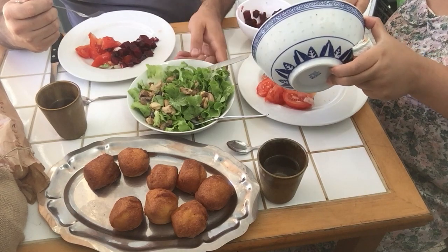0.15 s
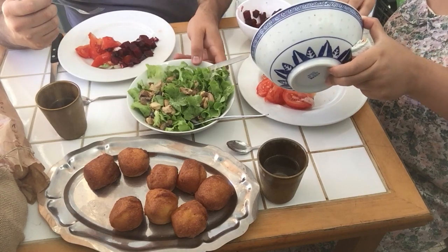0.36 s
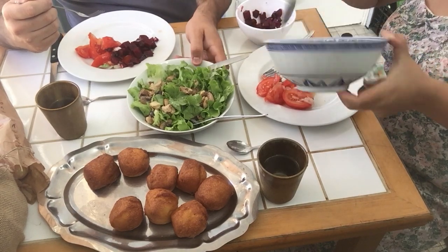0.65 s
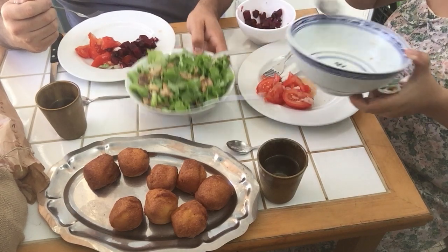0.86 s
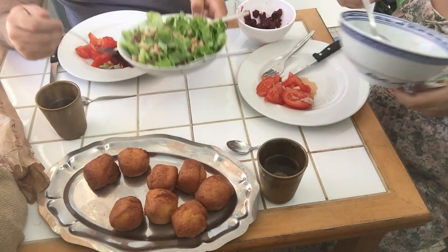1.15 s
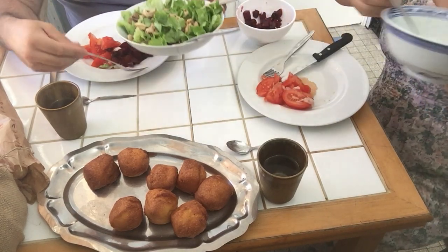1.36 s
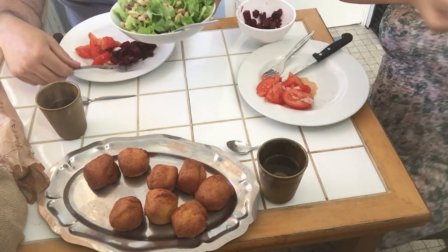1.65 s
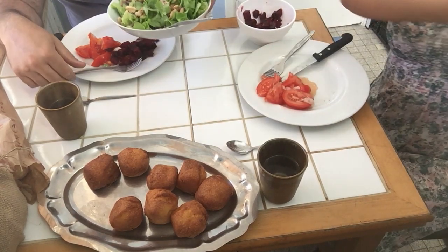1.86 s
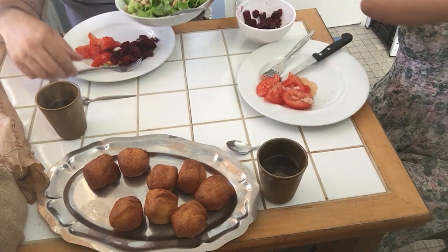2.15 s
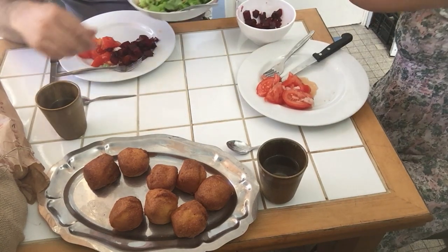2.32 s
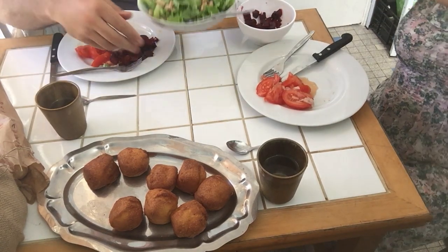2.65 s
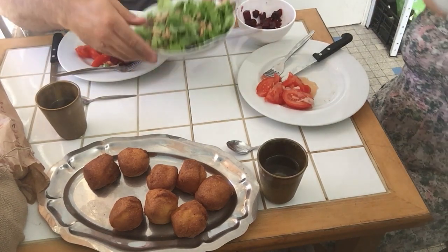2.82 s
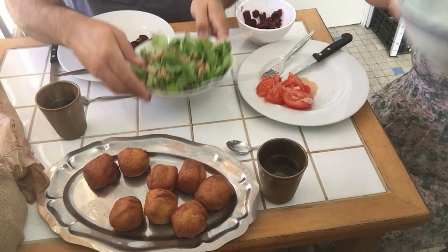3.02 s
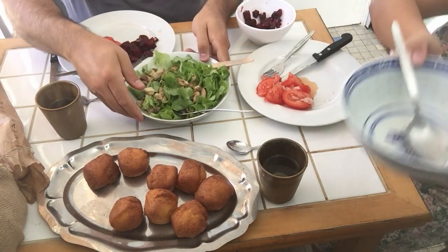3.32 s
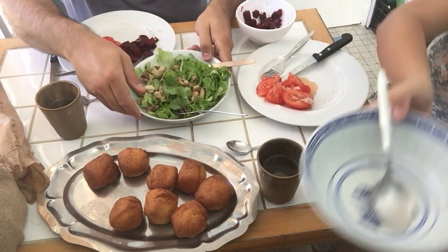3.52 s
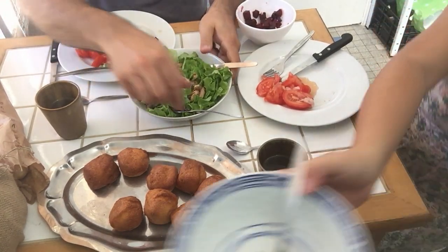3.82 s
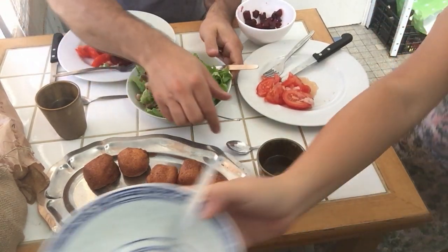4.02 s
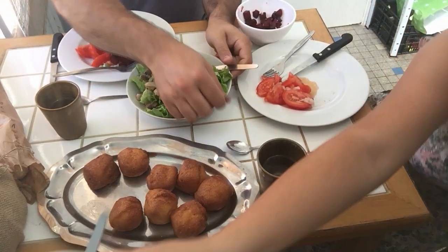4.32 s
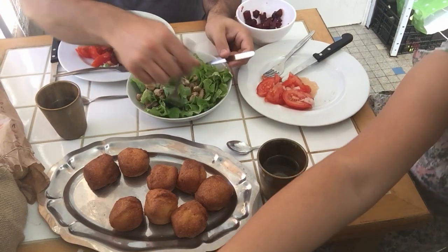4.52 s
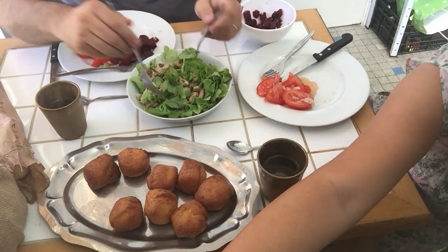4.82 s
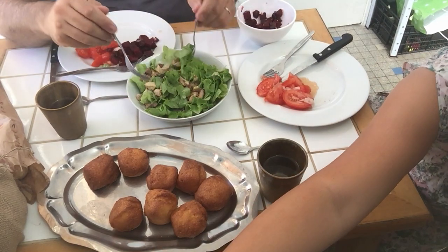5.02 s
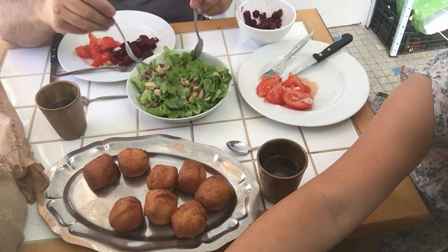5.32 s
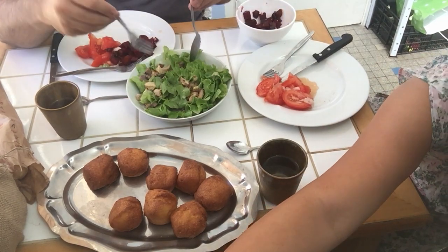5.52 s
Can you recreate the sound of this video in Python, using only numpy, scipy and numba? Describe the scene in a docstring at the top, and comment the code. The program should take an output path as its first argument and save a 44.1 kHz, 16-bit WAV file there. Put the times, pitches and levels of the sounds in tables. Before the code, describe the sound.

Close to the microphone in a small, hard, lively kitchen, a steel spoon clinks brightly in a porcelain bowl. Cutlery then chatters on a plate with dull table thuds. A shoe sole scuffs the floor, a bowl is set down in a hard cluster of knocks, servers clink on glass and scrape briefly, and faint wooden taps finish. Low hum and air beneath; sound only in the left channel.

```python
"""Laying up in a small hard kitchen

Close to the microphone, a steel spoon clinks in a porcelain bowl, cutlery rattles on a plate, servers knock
a glass bowl, dishes land on a tiled table and wooden servers tap: each blow rings a bank of decaying modes.
Filtered noise makes the gritty scrapes, the deep thumps under some blows and a sole scuffing the floor.
A dense noise tail is the room; wavering mains hum, air and a faint rustle lie beneath.
Only the left input of the recorder is wired."""
import sys
import numpy as np
from numba import njit
from scipy import signal
from scipy.fft import rfft, irfft, next_fast_len
from scipy.io import wavfile
from scipy.ndimage import uniform_filter1d

SR = 44100
rng = np.random.default_rng(int(sys.argv[2]) if len(sys.argv) > 2 else 0)


def wav_out(sig):
    """Save sig, one row per channel (or a flat mono array), as 16-bit PCM at SR to the path in sys.argv[1]."""
    wavfile.write(sys.argv[1], SR, np.round(np.clip(np.atleast_2d(sig).T, -1, 1) * 32767).astype(np.int16))


N = 249867  # length in samples
# All scene levels are those ahead of the recorder's input gain.


def undb(db):
    """Decibels to gain."""
    return 10 ** (np.asarray(db) / 20)


def unit(x):
    """Scale to rms 1."""
    return x / np.sqrt(np.mean(x ** 2))


def colour(x, points):
    """Shape a spectrum by (f/Hz, level/dB) points joined on a log frequency axis."""
    hz, db = np.transpose(points)
    size = next_fast_len(len(x))
    f = np.maximum(np.arange(size // 2 + 1) * SR / size, 1)
    gain = undb(np.interp(np.log(f), np.log(hz), db))
    return irfft(rfft(x, size) * gain, size)[:len(x)]


def level_curve(table):
    """Join (t/s, level/dB) points by straight lines, at every sample."""
    s, db = np.transpose(table)
    return np.interp(np.arange(N) / SR, s, db)


def walk(rate):
    """Random levels, rate of them a second, slewed from one to the next; spread near 1."""
    k = int(SR / rate)
    steps = np.repeat(rng.standard_normal(N // k + 1), k)
    return 1.2 * uniform_filter1d(steps, k)[:N]


SWELL_DB = 25  # a movement rises by this much as it swells


def stroke(start_s, swell_s, hold_s, fade_db_per_s, db):
    """Gain of one movement: swell, hold, fade."""
    t = np.arange(N) / SR - start_s
    swell_db = SWELL_DB * np.clip(1 - t / swell_s, 0, 1)
    fade_db = fade_db_per_s * np.maximum(t - swell_s - hold_s, 0)
    return (t > 0) * undb(db - swell_db - fade_db)


@njit(fastmath=True)
def resonate(push, pole, gain):
    """A bank of decaying modes driven by a force."""
    out, re, im = np.zeros(len(push)), np.zeros(len(pole)), np.zeros(len(pole))
    c, s = pole.real.copy(), pole.imag.copy()
    for i in range(len(push)):
        total = 0.
        for k in range(len(c)):
            re[k], im[k] = re[k] * c[k] - im[k] * s[k] + push[i], re[k] * s[k] + im[k] * c[k]
            total += gain[k] * im[k]
        out[i] = total
    return out


def contact(blow, chatter, short, length):
    """The contact force chatters: one firm touch, then a fading shower of lesser ones."""
    fade = np.exp(-short / max(blow["rattle_s"], 1 / SR))
    lesser = rng.standard_normal(len(short)) * (rng.random(len(short)) < .03)
    touch = np.full(length, 1e-18)  # a trace of force keeps the arithmetic fast
    touch[:len(short)] = chatter * lesser * fade
    touch[0] = 1
    push = np.hanning(int(blow["push_s"] * SR) + 3)  # a softer contact pushes longer
    return np.convolve(touch / np.linalg.norm(touch), push / push.sum())[:length]


# The points of every blow's colour: f/Hz
COLOUR_HZ = [400, 1300, 4000, 11000]
PIVOT_HZ = 2300  # brightness tilts the colour about this pitch
CRACK_DULL_DB = -8  # the crack has less treble than the ring


def crack(blow, tone_db, short):
    """The noise of the contact itself, a quick burst that fades with the rattle."""
    floor = (COLOUR_HZ[0] / 2, tone_db[0] - 22)
    tone = [floor] + list(zip(COLOUR_HZ, tone_db + np.array([0, 0, 0, CRACK_DULL_DB])))
    noise = colour(rng.standard_normal(len(short)), tone)
    fade = np.exp(-short / max(blow["rattle_s"], 1 / SR))
    return noise * fade * (1 - np.exp(-short / .0007)) * undb(blow["crack_db"])


SPOT_DB, SPOT_OCTAVES = 6, .12  # lift of modes near the struck spot's pitch, and its reach


def strike(blows, columns, kind, hz, body, span_s, shift, chatter, tool=()):
    """Each blow rings the modes of a body (and of the tool); what its row omits comes from its kind."""
    out = np.zeros(N)
    db, t60 = np.transpose(list(body) + list(tool))
    is_tool = np.arange(len(db)) >= len(body)
    t = np.arange(int(span_s * SR)) / SR
    short = t[:SR // 8]
    for s, level_db, *rest in blows:
        blow = {"tool_db": 0, "spot_hz": 1, **kind, **dict(zip(columns.split(), rest))}
        tone_db = blow["tone_db"] + blow["bright_db"] * np.log2(np.array(COLOUR_HZ) / PIVOT_HZ)
        spot_octaves = np.log2(np.array(hz) / blow["spot_hz"])
        spot_db = SPOT_DB * np.exp(-(spot_octaves / SPOT_OCTAVES) ** 2)
        mode_tone_db = np.interp(np.log(hz), np.log(COLOUR_HZ), tone_db)
        gain = undb(db + is_tool * blow["tool_db"] + spot_db + mode_tone_db)
        pitch = hz * (1 + shift * rng.standard_normal(len(db)))  # grip and struck spot shift the modes
        # the hand adds its loss to that of the ware, most to the low modes
        loss = np.log(1000) * (1 / t60 + 1000 / pitch / max(blow["grip_s"], .01))
        force = contact(blow, chatter, short, len(t))
        pole = np.exp((2j * np.pi * pitch - loss) / SR)
        sound = resonate(force, pole, gain / np.linalg.norm(undb(db)))
        sound[:len(short)] += crack(blow, tone_db, short)
        end_fade = np.clip((span_s - t) * 20, 0, 1)
        i = int(s * SR)
        out[i:i + len(t)] += (undb(level_db) * sound * end_fade)[:N - i]
    # each kind sends out nothing below its lowest pitch
    return signal.sosfilt(signal.butter(4, kind["low_hz"], "high", fs=SR, output="sos"), out)


# The hum's fundamental, wavering and growing: t/s, level/dB
HUM = [(0.0, -71), (0.19, -66), (0.33, -81), (0.41, -68), (1.04, -72), (1.83, -64), (2.24, -70),
       (2.49, -64), (3.68, -65), (3.85, -59), (3.93, -70), (4.07, -59), (4.2, -68), (4.31, -60),
       (4.72, -63), (4.77, -71), (4.87, -62), (5.67, -64)]
MAINS_HZ, HUM_WAVER_DB = 49.4, 2.2
HUM_SECOND_DB, HUM_THIRD_DB = -77, -74  # harmonics


def mains_hum():
    """A sine and two harmonics share one wandering pitch; each wavers in level by itself."""
    turn = 2 * np.pi * np.cumsum(MAINS_HZ * (1 + 0.0067 * walk(2.2))) / SR
    first = undb(level_curve(HUM) + HUM_WAVER_DB * walk(7)) * np.sin(turn)
    second = undb(HUM_SECOND_DB + 2.5 * walk(6)) * np.sin(2 * turn + 1)
    third = undb(HUM_THIRD_DB + 2.6 * walk(7)) * np.sin(3 * turn + 2)
    return np.sqrt(2) * (first + second + third)  # levels are rms


# Colour of the still air, relative: f/Hz, level/dB
AIR = [(35, -27.5), (60, -3.5), (108, -10.5), (412, -12), (675, -16), (1010, -17.5), (2040, -29),
       (2350, -19.5), (2580, -36.5), (3260, -27), (6150, -29.5), (14700, -39.5), (16500, -57.5)]
AIR_DB = -72.5  # rms


def still_air():
    """Steady noise, strongest in the bass."""
    points = [(30, -40.5)] + list(AIR)
    return undb(AIR_DB) * unit(colour(rng.standard_normal(N), points))


# Sleeves and leaves rub: t/s, level/dB
RUBBING = [(0, -77.5), (2.1, -68.5), (2.35, -74), (2.9, -68.5), (3.3, -71), (3.95, -75.5), (4.55, -69.5),
           (4.9, -74), (5.45, -75.5), (5.67, -69)]


def rustle():
    """Faint hiss of sleeves and leaves, flickering in level."""
    tone = [(300, -18.5), (1000, 0), (3500, 0), (7000, -7), (12000, -17.5)]
    hiss = unit(colour(rng.standard_normal(N), tone))
    flicker_db = 1.2 * walk(20)
    return undb(level_curve(RUBBING) + flicker_db) * hiss


# In the blow tables and kinds below, brightness is in dB/octave about PIVOT_HZ; rattle is the time in which
# the contact noise fades to 1/e; grip ring is the t60 that the hand's loss alone would allow at 1 kHz.
# A kind holds what its blows share: tone/dB at COLOUR_HZ, crack/dB, rattle/s, grip ring/s, brightness,
# lowest pitch sent out/Hz, extra length of the push/s.

# Spoon blows: t/s, level/dB, brightness/(dB/octave), grip ring/s, pitch favoured by the struck spot f/Hz
SPOON_IN_BOWL = [(.06, -30, -2.5, .17, 2920), (.393, -17.5, .3, .12, 4600), (.459, -24, -1.5, .27, 2920),
                 (.973, -12, -.3, 2.7, 11950), (1.667, -19, 3, .16, 3050)]
# The porcelain bowl's modes: f/Hz
BOWL_HZ = [878, 930, 1692, 2920, 2928, 3600, 4462, 4505, 5200, 5680, 6310, 6616, 8430, 9790, 10170, 10790,
           11360, 11950, 12680, 13345, 13900, 14520, 15175, 15430]
# The same modes: level/dB, free t60/s
BOWL = [(-12.5, 4), (-11.5, 0.2), (-11, 1.6), (-13.5, .7), (-3, 0.15), (-18.5, 0.16), (-3, 0.28),
        (-2.5, 0.051), (-27, 0.3), (-13, 0.1), (-1, 0.2), (-29, .4), (-5.5, .17), (-49, .35), (-34, .4),
        (-20, 0.26), (-22.5, 0.35), (-10, 0.29), (-12, .15), (-26, 0.22), (-19, 0.22), (-21, .3),
        (-22, 0.33), (-26, 0.14)]
# Kind: steel on porcelain
SPOON = dict(tone_db=[-22, -11, -2, -8], crack_db=3, rattle_s=.0065, low_hz=650, push_s=0)


def spoon_in_bowl():
    """Hard steel on porcelain: almost no pitch shift, little chatter, a long ring."""
    return strike(SPOON_IN_BOWL, "bright_db grip_s spot_hz", SPOON, BOWL_HZ, BOWL, .62,
                  shift=.0003, chatter=.08)


# Soft, dull thuds: t/s, level/dB, rattle/s
THUDS = [(.756, -50, .019), (1.029, -32, .024), (1.377, -37, .013), (1.572, -34, .011), (1.76, -39, .02),
         (4.2, -44, .025), (4.46, -46, .015), (5.508, -45, .004), (5.59, -50, .03)]
# The table top's modes: f/Hz
TABLE_HZ = [300, 375, 430, 560, 660, 780, 900, 1025, 1250, 1480, 1680, 2000, 2460, 3040, 4600, 5680, 7430]
# The same modes: level/dB, free t60/s
TABLE = [(-5, .2), (0.5, 0.85), (2, 0.12), (-4.5, 0.23), (-1, 0.11), (-3, 0.3), (-6, 0.11), (-1.5, .12),
         (-4, 0.065), (-12.5, 0.037), (-5.5, 0.056), (-15.5, 0.065), (-4, 0.049), (-6.5, 0.064),
         (-5.5, .09), (-13, .06), (-5, 0.041)]
# Kind: a soft contact on the table
PALM = dict(tone_db=[-1, -14, -20, -38], crack_db=-2, grip_s=.25, bright_db=0, low_hz=280, push_s=.0015)


def table_thuds():
    """A long soft push rings the table top with little treble."""
    return strike(THUDS, "rattle_s", PALM, TABLE_HZ, TABLE, .25, shift=.03, chatter=.4)


# Slides over china and tile: start t/s, swell/s, hold/s, fade/(dB/s), level/dB, brightness/(dB/octave)
SCRAPES = [(.787, .01, .005, 250, -57, 0), (1.58, .01, .04, 150, -54, 0), (4.195, .012, .035, 190, -43, .5),
           (5.53, .06, .1, 100, -65, -6)]
GRIT_PER_S, GRIT_DB = 5000, 2.5  # grains a second; mean of their random extra level


def scrapes():
    """Dense grains of uneven size, shaped by each slide."""
    base_tone = [(250, -14), (600, 3), (2500, 0), (7000, -2), (15000, -9)]
    out = 0
    for *move, bright_db in SCRAPES:
        hits = (rng.random(N) < GRIT_PER_S / SR) * rng.standard_normal(N)
        grains = hits * undb(GRIT_DB * rng.exponential(size=N))
        tone = [(hz, db + bright_db * np.log2(hz / PIVOT_HZ)) for hz, db in base_tone]
        out = out + stroke(*move) * unit(colour(grains, tone))
    return out


# Fork blows: t/s, level/dB, brightness/(dB/octave), rattle/s, ring of the fork level/dB,
# pitch favoured by the struck spot f/Hz, grip ring/s
FORK_ON_PLATE = [(.799, -40, 1, .004, -11, 2000, .1), (1.313, -32, 3.5, .016, -5, 7900, .2),
                 (1.379, -22, .5, .0076, -9.5, 1835, .35), (1.501, -38, 1, .024, 8, 3770, .2),
                 (1.534, -31, -1, .011, -11, 1835, .3), (1.572, -24, -1, .022, -6, 2170, .3),
                 (1.755, -20, .5, .02, 2, 2170, .25), (1.789, -28, -3, .013, 1, 2950, .3),
                 (1.809, -26, -1.5, .022, 1, 2170, .3), (1.892, -19, .5, .018, 3.5, 2700, .2),
                 (1.904, -22, -1, .02, 0, 1835, .4), (4.381, -33, 0, .006, 3, 1835, .07)]
# The plate's modes: f/Hz
PLATE_HZ = [985, 1835, 2169, 2790, 6670, 7880, 8015, 9213, 10120, 10680, 12200, 13390, 14800, 15300]
# The same modes: level/dB, free t60/s
PLATE = [(-25, 2.6), (-2.5, 0.32), (-4.5, 0.17), (3.5, 0.11), (-4, 0.18), (-2, 0.11), (-10.5, .3),
         (-22.5, 0.19), (-25, 0.1), (-25.5, 0.24), (-11, .2), (-19, .2), (-16, .25), (-28, 0.25)]
# The fork's modes: f/Hz
FORK_HZ = [2545, 2945, 3745, 3800, 4275, 4545, 4618, 5577, 9790, 11700, 13900]
# The same modes: level/dB, free t60/s
FORK = [(-5, 0.14), (-8, 0.24), (-10.5, 0.22), (-6.5, 0.31), (-13, 0.12), (-18.5, 0.35), (-10.5, 0.24),
        (-7.5, 0.36), (-14.5, .25), (-17.5, 0.42), (-34.5, 0.26)]
# Kind: cutlery on china
CUTLERY = dict(tone_db=[-18, -11, -9, -7], crack_db=1.5, low_hz=450, push_s=0)


def fork_on_plate():
    """A chattering contact rings plate and fork together."""
    return strike(FORK_ON_PLATE, "bright_db rattle_s tool_db spot_hz grip_s", CUTLERY,
                  PLATE_HZ + FORK_HZ, PLATE, .45, shift=.003, chatter=.4, tool=FORK)


# The table legs jolt: t/s, level/dB
THUMPS = [(1.38, -60), (3.445, -55), (3.69, -64)]
THUMP_HOLD_S, THUMP_FADE_DB_PER_S = .03, 250


def thumps():
    """A short deep rumble of low noise under a few of the table's blows."""
    tone = [(50, -30), (80, 0), (190, 0), (300, -30), (600, -70)]
    deep = unit(colour(rng.standard_normal(N), tone))
    return deep * sum(stroke(s, .01, THUMP_HOLD_S, THUMP_FADE_DB_PER_S, db) for s, db in THUMPS)


# The sole's resonances: f/Hz, a third of the bandwidth f/Hz, level/dB
SOLE = [(673, 22, 1), (872, 28.5, 1), (1130, 73, 2), (1423, 10, -1), (1630, 30, -13)]
# The drone's movement: start t/s, swell/s, hold/s, fade/(dB/s), level/dB
SCUFF_DRONE = (2.36, .08, .19, 90, -52.5)
# The hiss's movement: the same columns
SCUFF_HISS = (2.33, .3, .2, 85, -58)


def scuff():
    """Grit under a sliding sole drones in the sole's resonances; a slower hiss outlasts the drone."""
    grit = rng.standard_normal(N) * undb(1.36 * walk(60))
    drone = 0
    for hz, width, db in SOLE:
        peak = signal.iirpeak(hz, hz / max(3 * width, 20), SR)
        drone = drone + undb(db) * unit(signal.lfilter(*peak, grit))
    drone = colour(drone, [(420, -33), (560, 4.5), (1800, -5), (3000, -10)])
    hiss_tone = [(1000, -5), (2200, -0.5), (3600, 3.5), (5000, -6), (7000, -9), (11000, -38)]
    hiss = colour(rng.standard_normal(N), hiss_tone)
    return stroke(*SCUFF_DRONE) * unit(drone) + stroke(*SCUFF_HISS) * unit(hiss)


# Hard feet of dishes meet the table: t/s, level/dB, brightness/(dB/octave)
KNOCKS = [(3.441, -13, -1.5), (3.454, -16, 1.5), (3.472, -15, 0), (3.495, -20, 2), (3.516, -30, -1),
          (3.575, -20, 0), (3.685, -27, 0), (4.313, -30, -2.5), (4.443, -40, -3), (5.059, -32, -3)]
# Kind: a dish on the table
DISH = dict(tone_db=[-13, 0, -14, -31], crack_db=-3, rattle_s=.012, grip_s=.1, low_hz=330, push_s=.0001)


def dish_knocks():
    """Hard feet push briefly and ring the table top."""
    return strike(KNOCKS, "bright_db", DISH, TABLE_HZ, TABLE, .25, shift=.03, chatter=.4)


# Server blows: t/s, level/dB, brightness/(dB/octave), grip ring/s, pitch favoured by the struck spot f/Hz
SERVER_ON_GLASS = [(3.683, -33, -1, .42, 2400), (3.729, -36, 0, .18, 3100), (3.989, -25, 1, .26, 1815),
                   (4.178, -36, 3.5, .3, 4400), (4.193, -33, 0, .3, 1430), (5.059, -49, 0, .5, 4500),
                   (5.157, -45, -3, 2.5, 1815)]
# The glass bowl's modes: f/Hz
GLASS_HZ = [1005, 1432, 1815, 2400, 3080, 3155, 3887, 4350, 4495, 5960, 6800, 7830, 9012, 9650, 11600]
# The same modes: level/dB, free t60/s
GLASS = [(-9, 0.47), (-30.5, 0.17), (-8.5, 0.74), (-10, .2), (-2, 0.23), (-4, 0.28), (-14.5, 0.083),
         (1, 0.1), (0.5, 0.083), (1.5, 0.13), (-9.5, 0.17), (-1, .2), (-2.5, 0.086), (-11, .3), (-2, 0.18)]
# Kind: a server on glass
SERVER = dict(tone_db=[-19, -11, -13, -24], crack_db=1.5, rattle_s=.009, low_hz=400, push_s=0)


def server_on_glass():
    """A chattering server rings the glass salad bowl."""
    return strike(SERVER_ON_GLASS, "bright_db grip_s spot_hz", SERVER, GLASS_HZ, GLASS, .4,
                  shift=.004, chatter=.35)


# Taps of the wooden servers: t/s, level/dB, brightness/(dB/octave)
SALAD_TAPS = [(4.678, -50, 0), (4.775, -45, -1), (4.829, -44, 0), (4.978, -46.5, 0), (5.062, -38, 5),
              (5.158, -41, 0), (5.189, -52, 0), (5.278, -47, 1), (5.374, -41, -2), (5.41, -51, -1),
              (5.446, -43, 2)]
# The wooden servers' modes: f/Hz
SERVERS_HZ = [600, 990, 1250, 1480, 1950, 2700, 4550]
# The same modes: level/dB, free t60/s
SERVERS = [(-3.5, 0.042), (-2, 0.068), (-3.5, 0.091), (0.5, 0.037), (-7.5, 0.074), (-8.5, 0.048),
           (-19.5, 0.14)]
# Kind: wood
WOOD = dict(tone_db=[-12, 3, -18, -36], crack_db=-12, rattle_s=.009, grip_s=.07, low_hz=480, push_s=.0004)


def salad_taps():
    """The wooden servers' own modes, which die within a fraction of a second."""
    return strike(SALAD_TAPS, "bright_db", WOOD, SERVERS_HZ, SERVERS, .15, shift=.02, chatter=.25)


# How long the kitchen rings: f/Hz, t60/s
ROOM = [(250, .5), (1000, .5), (4000, 0.46), (12000, 0.33)]
ROOM_DB, ROOM_GAP_S = -7, .007  # level of the tail, and the time it takes to build up


def room(x):
    """A dense noise tail whose octaves die at their own rates."""
    t = np.arange(SR // 2) / SR
    hz, t60 = np.transpose(ROOM)
    tail = 0
    for f in 125 * 2. ** np.arange(8):
        octave = [(f / 2, -60), (f / np.sqrt(2), -3), (f, 0), (f * np.sqrt(2), -3), (f * 2, -60)]
        band = colour(rng.standard_normal(len(t)), octave)
        band_t60 = np.interp(np.log(f), np.log(hz), t60)
        tail = tail + band * np.exp(-np.log(1000) * t / band_t60)
    tail = tail * (1 - np.exp(-(t / ROOM_GAP_S) ** 2))
    return undb(ROOM_DB) * signal.fftconvolve(x, tail / np.linalg.norm(tail))[:N]


def scene():
    """The table close by and its echo, the sole and the background, at one microphone."""
    background = mains_hum() + still_air() + rustle()
    near = spoon_in_bowl() + table_thuds() + scrapes() + fork_on_plate() + thumps()
    near = near + dish_knocks() + server_on_glass() + salad_taps()
    heard = near + room(near) + scuff() + background
    return np.array([heard, np.zeros(N)])


TOP_HZ = 16100  # the recorder passes nothing much above this


def record(dry):
    """Both inputs gain 6 dB, the open right one is all but silent; the top is cut."""
    wired = 2 * dry + undb(-140) * rng.standard_normal(dry.shape)
    return signal.sosfilt(signal.ellip(10, .2, 70, TOP_HZ, fs=SR, output="sos"), wired)


dry = scene()
out = record(dry)
wav_out(out)
```